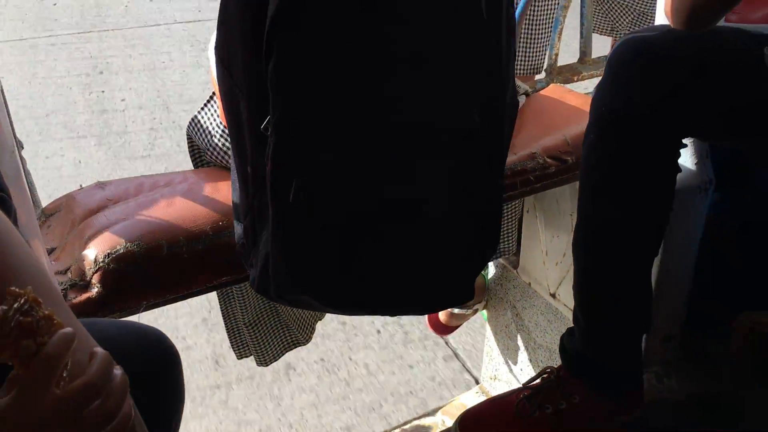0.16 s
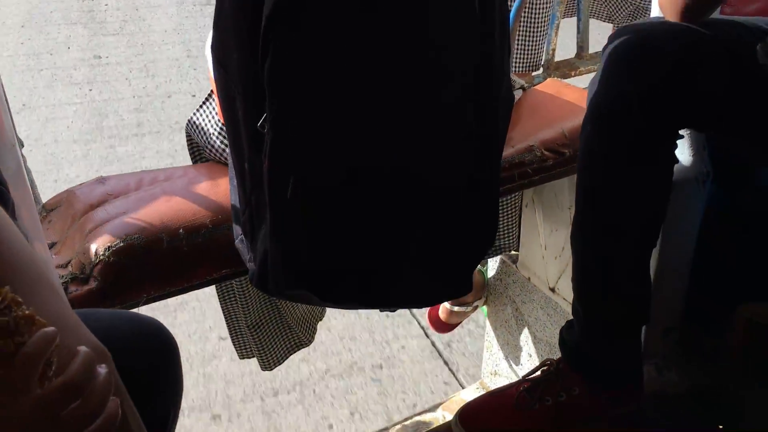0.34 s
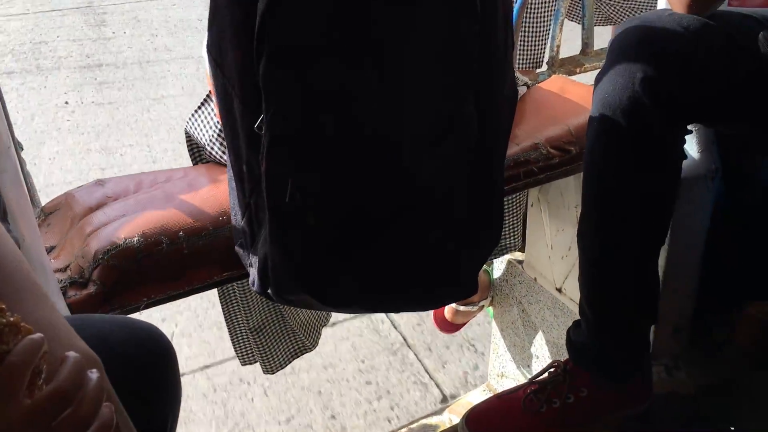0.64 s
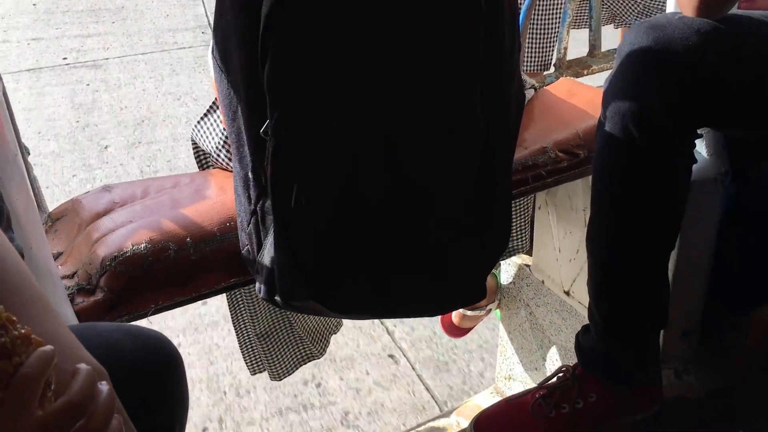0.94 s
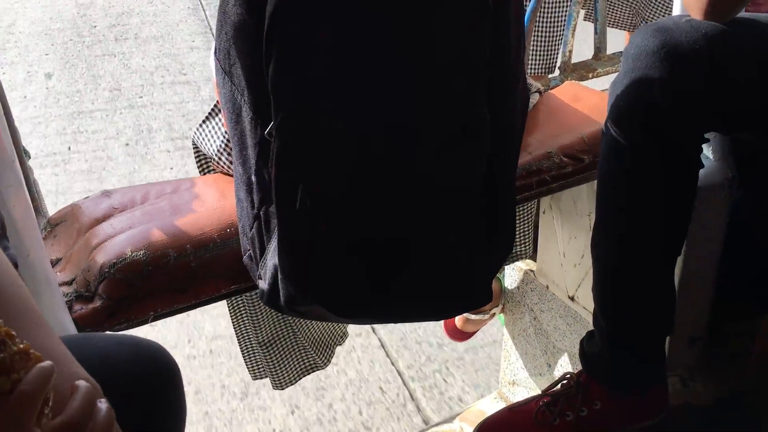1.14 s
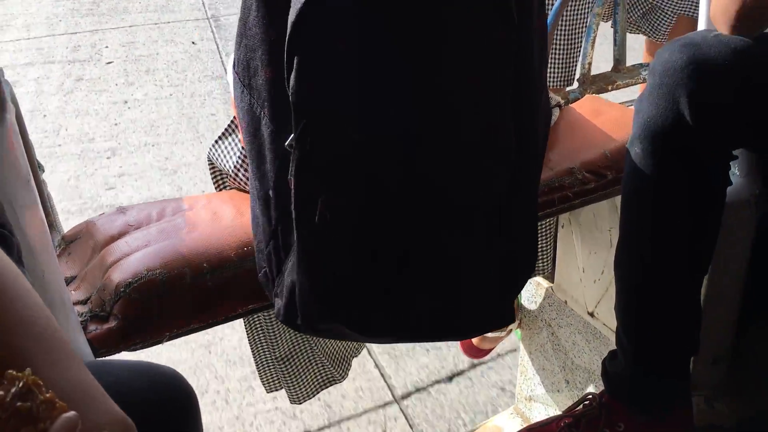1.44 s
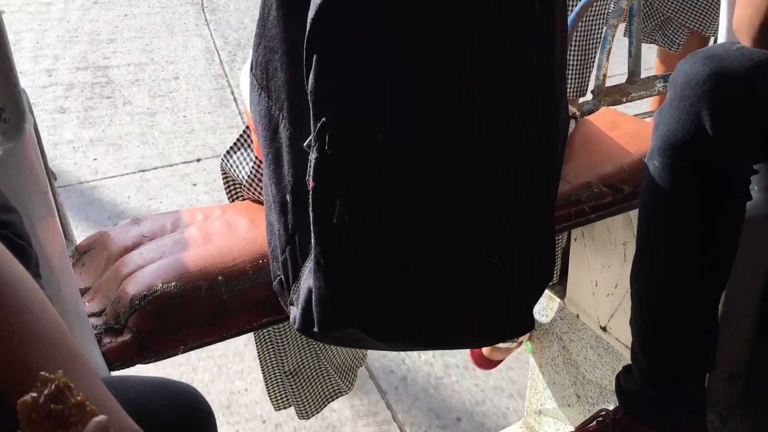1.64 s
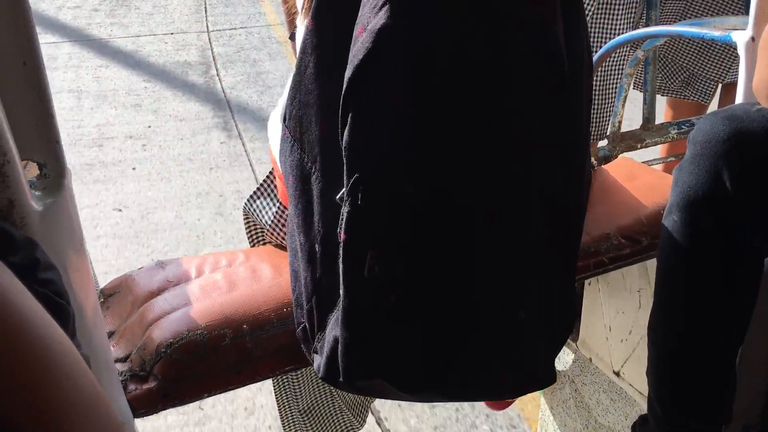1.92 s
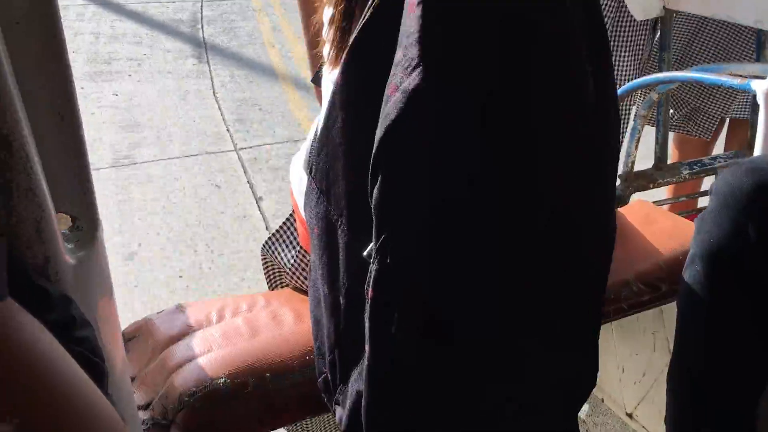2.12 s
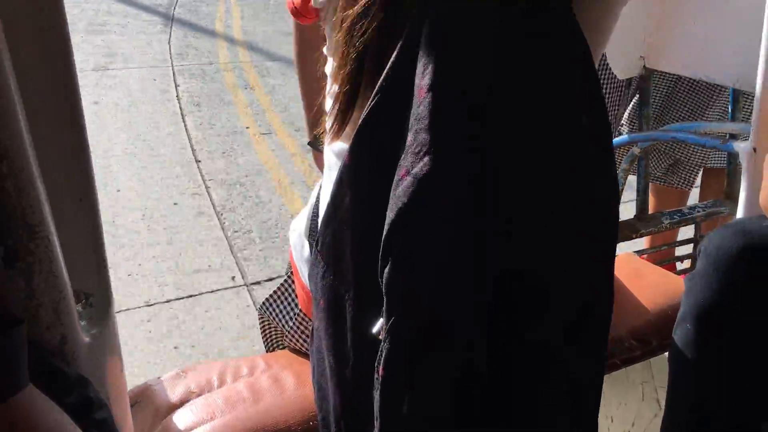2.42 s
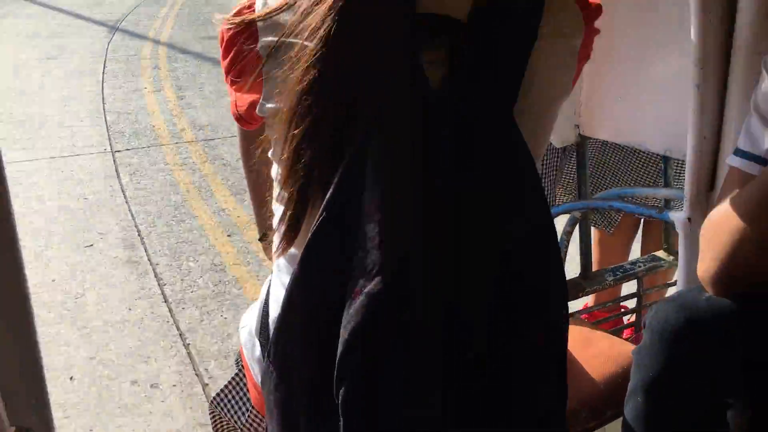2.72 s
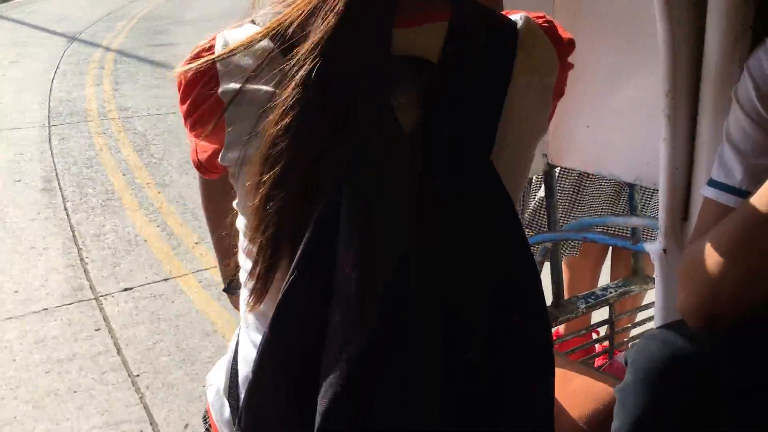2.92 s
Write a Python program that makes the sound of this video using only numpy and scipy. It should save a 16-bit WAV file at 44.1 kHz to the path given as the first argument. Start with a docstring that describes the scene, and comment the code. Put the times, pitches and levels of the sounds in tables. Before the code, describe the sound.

A diesel bus engine drones low, then growls louder and clanks as the throttle opens.

```python
"""A four-cylinder diesel, heard from a passenger seat in an open-sided bus on a concrete road.
Sines at the firing rate and its multiples make the exhaust; bursts of noise at each firing ring the block.
Halfway the driver opens the throttle: the exhaust hardens, the knock grows and the engine cover clanks.
Coloured noise makes the road's rumble and hiss; grainy bursts and rough chirps make the loose metal
fittings rattle and squeak. One channel, with rounded peaks and no extreme treble."""
import sys
import numpy as np
from scipy import signal
from scipy.fft import rfft, irfft, next_fast_len
from scipy.io import wavfile
from scipy.ndimage import uniform_filter1d

SR = 44100
rng = np.random.default_rng(int(sys.argv[2]) if len(sys.argv) > 2 else 0)


def master_out(mix):
    """Clip the mix to full scale and print it as 16-bit PCM to the path in sys.argv[1]."""
    frames = np.transpose(np.atleast_2d(mix))
    ceiling = np.clip(frames, -1, 1)
    pcm = np.round(ceiling * 32767).astype(np.int16)
    wavfile.write(sys.argv[1], SR, pcm)


N = 135387  # samples

# Boom of the cabin at the firing rate: t/s, level/dB
BOOM_LEVEL = [(0, -23.5), (.07, -20.5), (.19, -20.5), (.24, -10.5), (.45, -19.5), (.63, -11.5),
              (.73, -16.5), (1.13, -15), (1.3, -23), (1.36, -11.5), (1.44, -20), (1.7, -22), (1.82, -14.5),
              (1.92, -11), (2.15, -12.5), (2.45, -13), (2.78, -20), (3.03, -13)]
# Throttle: t/s, exhaust overtone level/dB, knock level/dB
THROTTLE_LEVELS = [(0, -29.5, -45), (.6, -36, -46.5), (1.1, -31.5, -45), (1.45, -28.5, -46),
                   (1.68, -23.5, -38), (1.85, -17, -32), (2.02, -17.5, -27.5), (2.25, -16.5, -31),
                   (2.5, -18.5, -31), (2.65, -22, -36), (2.8, -23, -38), (2.95, -21.5, -34.5),
                   (3.07, -19.5, -31)]
# Exhaust overtones: multiple of the firing rate, relative level/dB
EXHAUST_OVERTONES = [(1.25, -28), (1.75, -17.5), (2, -1.5), (2.25, -16.5), (2.5, -12.5), (3, -13),
                     (3.5, -24.5), (4, -24.5)]
# Strength of each cylinder's knock in firing order: relative level/dB
CYLINDER_LEVEL_DB = [4.5, 1.3, 1.8, -3]
# Ringing of the engine block and its cover: f/Hz, width/Hz, relative level/dB
BLOCK_MODES = [(699.7, 24.5, 6.5), (996, 80, 2), (1188, 45, -0.5), (1601, 31, 3.5), (1914, 85, 0.5),
               (2767, 65, -7.5), (3248, 20, -2)]
# Broad crack of the knock: f/Hz, relative level per Hz/dB
CRACK_COLOUR = [(100, -22), (300, -11), (430, -5), (520, -9), (1000, -1), (1370, -5), (2000, -2),
                (2450, -6), (3400, -5), (4400, -12), (5500, -19), (9000, -32), (11000, -47)]
# Sizzle that joins the knock under load: f/Hz, relative level per Hz/dB
SIZZLE_COLOUR = [(1000, -25), (3000, 2), (9500, -8), (10500, -14), (16000, -18)]
# Whine of the engine's gears: f/Hz, level relative to the knock/dB
GEAR_WHINE = [(676, -22), (985, -15.5), (1118, -19), (2292, -19), (2466, -24)]
# Road rumble: f/Hz, relative level per Hz/dB; then t/s, level/dB
RUMBLE_COLOUR = [(15, -10.5), (30, -25.5), (42, -1.5), (52, 7.5), (80, 3), (100, -2), (150, -6), (200, -23),
                 (330, -35.5), (700, -78.5)]
RUMBLE_COURSE = [(0, -23), (.9, -25), (1.35, -20.5), (1.6, -22), (1.85, -16.5), (2.15, -21.5), (2.6, -22.5),
                 (3.07, -21.5)]
# Drone of the body panels: f/Hz, relative level per Hz/dB; then t/s, level/dB
DRONE_COLOUR = [(100, -10.5), (180, 1.5), (340, 1.5), (450, -5.5), (520, -9.5), (2000, -44.5)]
DRONE_COURSE = [(0, -37.5), (.35, -34.5), (.95, -37.5), (1.32, -33.5), (1.5, -35), (2, -32.5), (2.3, -38),
                (2.8, -39.5), (3.07, -35)]
# Rush of tyres and air: f/Hz, relative level per Hz/dB; then t/s, level/dB
RUSH_COLOUR = [(100, -2.5), (350, -16), (560, -0.5), (950, 1), (1500, -4.5), (2100, -12), (2600, -5.5),
               (3200, -21), (5000, -23.5), (7500, -36), (16000, -71)]
RUSH_COURSE = [(0, -41.5), (.95, -45.5), (1.7, -37.5), (2.7, -43)]
# Rattles of loose fittings, before the cabin: start t/s, decay/s, level/dB, ring f/Hz
RATTLE_EVENTS = [(.049, 0.0071, -47.5, 9000), (0.293, 0.0039, -34, 7400), (0.338, 0.019, -43, 11500),
                 (.378, 0.026, -50, 6700), (1.038, 0.0082, -48, 9000), (1.219, 0.0062, -40.5, 2800),
                 (1.444, 0.03, -51, 5500), (1.484, 0.03, -51.5, 6300), (1.535, 0.012, -47, 12600)]
# Colour of the fittings: f/Hz, relative level per Hz/dB
FITTING_COLOUR = [(1500, -22), (2800, -2), (6800, 1), (10000, -5), (11500, -2), (16000, -12)]
# Squeaks of a dry metal joint, before the cabin:
# start t/s, length/s, f/Hz, level/dB, glide per length as a share of f
SQUEAK_EVENTS = [(0.681, 0.02, 3750, -51, 0), (0.699, .013, 3720, -38.5, 0.04),
                 (0.822, .011, 3800, -40.5, -0.007), (0.827, 0.018, 3620, -40, -0.03)]
# Harmonics of a squeak from the first up: relative level/dB
SQUEAK_HARMONIC_DB = [2, -3, 2.5, -2]
# Blows on the engine cover: t/s, dull clank level/dB, bright chatter level/dB
COVER_BLOWS = [(1.844, -16.5, -42), (1.877, -32, -34), (1.944, -28, -29), (1.981, -24, -38),
               (2.012, -27, -30), (2.116, -36, -28), (2.15, -36, -30), (2.218, -18.5, -28),
               (2.287, -22, -32), (2.353, -25, -32), (2.422, -26, -28), (2.695, -28, -37),
               (2.763, -38, -37), (2.967, -37, -36), (3.033, -30, -32)]
# Colour of the dull clank: f/Hz, relative level per Hz/dB
CLANK_COLOUR = [(300, -18), (700, -8), (1050, 8), (1350, -8.5), (1600, -1.5), (2100, -15), (3200, -28),
                (5000, -56)]
# Ringing of the cover's edge: f/Hz, width of each of two passes/Hz, relative level/dB
COVER_MODES = [(2450, 200, 3), (2864, 230, 6.5), (3170, 96, 5.5), (3640, 130, -8), (4250, 140, -10),
               (4630, 380, -6)]

FIRING_HZ, FIRST_FIRING_S = 58.7, .0345
SPEED_WANDER = .001  # share of the speed
EXHAUST_LAG_S, BOOM_LAG_S = .009, .0013  # through the pipe; further lag of the cabin's boom
EXHAUST_WAVER_DB = -0.02
KNOCK_ATTACK_S, KNOCK_DECAY_S = 0.002, 0.012
CLATTER_SHARE = 0.06  # constant clatter added to the blows
KNOCK_SCATTER_DB, MODE_SCATTER_DB = 1.1, 2.3  # from firing to firing
RING_DB, CRACK_DB, SIZZLE_DB = -4, -5.5, -19  # relative to the knock
WHINE_WAVER = 0.1  # turns of phase
ENGINE_GRAIN_DB, FITTING_GRAIN_DB = 2.5, 4.5
SQUEAK_ROUGH = .035  # share of the pitch
SCRAPE_DB = -4  # relative to the squeak's harmonics
CLANK_DECAY_S, CHATTER_DECAY_S = .01, .01
CABIN_T60_S, CABIN_DB = .13, -7
CEILING = .78  # of full scale
TOP_HZ = 15800


def undb(db):
    """Decibels to gain."""
    return 10 ** (np.asarray(db) / 20)


def unit(x):
    """Scale to rms 1."""
    return x / np.sqrt(np.mean(x ** 2))


def noise():
    """White noise."""
    return rng.standard_normal(N)


def curve(table, t):
    """Gain along rows of t/s, level/dB."""
    return undb(np.interp(t, *np.array(table).T))


def walk(rate):
    """Smooth random drift: levels held 1 / rate s and slewed twice; spread near 1."""
    hold = int(SR / rate)
    steps = np.repeat(noise()[:N // hold + 1], hold)
    slewed = uniform_filter1d(uniform_filter1d(steps, hold), hold)
    return 1.3 * slewed[:N]


def colour(x, points):
    """Causal minimum-phase filter through points of f/Hz, level/dB; rms 1."""
    size = next_fast_len(N + SR // 2, True) // 2 * 2
    hz, db = np.array(points, float).T
    bins = np.fft.rfftfreq(size, 1 / SR) + 1
    log_gain = np.log(undb(np.interp(np.log(bins), np.log(hz), db)))
    # folding the cepstrum onto positive time makes the filter causal
    cepstrum = irfft(log_gain)
    cepstrum[1:size // 2] *= 2
    cepstrum[size // 2 + 1:] = 0
    response = np.exp(rfft(cepstrum))
    return unit(irfft(rfft(x, size) * response)[:N])


def resonate(x, hz, width):
    """One resonance, gain 1 at its centre."""
    return signal.lfilter(*signal.iirpeak(hz, hz / width, fs=SR), x)


def tone(turns):
    """Sine of rms 1."""
    return np.sqrt(2) * np.sin(2 * np.pi * turns)


def burst(t, start, decay):
    """Envelope of a blow: a quick rise and a fall."""
    age = np.maximum(t - start, 0)
    return (1 - np.exp(-age / 0.0028)) * np.exp(-age / decay)


def chatter(grain_db):
    """Grainy contact of metal bouncing on metal; rms 1."""
    return unit(noise() * undb(grain_db * walk(900)))


def cabin(x):
    """Seats, floor and roof add a dense, short ring."""
    t = np.arange(int(SR * CABIN_T60_S)) / SR
    tail = noise()[:len(t)] * np.exp(-np.log(1000) * t / CABIN_T60_S)
    wet = signal.fftconvolve(x, tail / np.linalg.norm(tail))[:N]
    return (x + undb(CABIN_DB) * wet) / np.hypot(1, undb(CABIN_DB))


def exhaust(t, firings):
    """Pulses arrive late through the pipe: a boom at the firing rate, and overtones set by the throttle."""
    turns = firings - EXHAUST_LAG_S * FIRING_HZ
    boom = curve(BOOM_LEVEL, t) * tone(turns - BOOM_LAG_S * FIRING_HZ)
    overtones = np.zeros(N)
    for multiple, db in EXHAUST_OVERTONES:
        level = undb(db + EXHAUST_WAVER_DB * walk(12))
        overtones += level * tone(multiple * turns + .013 * walk(9))
    return boom + curve(np.array(THROTTLE_LEVELS)[:, [0, 1]], t) * overtones


def gear_whine(firings):
    """Gears turn with the engine, so their tones follow its speed; level and phase waver."""
    whine = np.zeros(N)
    for hz, db in GEAR_WHINE:
        turns = hz * firings / FIRING_HZ + WHINE_WAVER * walk(29.92)
        whine += undb(db + 2 * walk(24.42)) * tone(turns)
    return whine


def knock(t, firings):
    """Each combustion cracks and rings the block with its own colour, some cylinders harder than others."""
    which = np.floor(firings).astype(int)
    cylinder_db = np.array(CYLINDER_LEVEL_DB)[which % len(CYLINDER_LEVEL_DB)]
    strength = undb(cylinder_db + KNOCK_SCATTER_DB * noise()[which])
    age = firings % 1 / FIRING_HZ
    envelope = (1 - np.exp(-age / KNOCK_ATTACK_S)) * np.exp(-age / KNOCK_DECAY_S)
    blow = strength * envelope + CLATTER_SHARE

    ring = np.zeros(N)
    for hz, width, db in BLOCK_MODES:
        scatter = undb(MODE_SCATTER_DB * noise()[which])  # one draw per firing
        ring += undb(db) * resonate(blow * scatter * noise(), hz, width)
    crack = undb(CRACK_DB) * cabin(colour(blow * noise(), CRACK_COLOUR))
    load = curve(np.array(THROTTLE_LEVELS)[:, [0, 2]], t)
    grains = np.sqrt(blow) * chatter(ENGINE_GRAIN_DB)
    # the sizzle follows the load twice: here and with the whole knock
    sizzle = undb(SIZZLE_DB) * load / load.max() * colour(grains, SIZZLE_COLOUR)
    return load * (undb(RING_DB) * unit(ring) + crack + sizzle + gear_whine(firings))


def road(t):
    """The body rumbles and its panels drone over the concrete; tyres and air rush in at the open sides."""
    rumble = curve(RUMBLE_COURSE, t) * colour(noise(), RUMBLE_COLOUR)
    drone = curve(DRONE_COURSE, t) * colour(noise(), DRONE_COLOUR)
    rush = curve(RUSH_COURSE, t) * colour(noise(), RUSH_COLOUR)
    return rumble + drone + rush


def rattles(t):
    """Loose fittings buzz briefly in grainy bursts, each with a ring of its own."""
    out = np.zeros(N)
    for start, decay, db, hz in RATTLE_EVENTS:
        contact = chatter(FITTING_GRAIN_DB)
        ring = unit(resonate(contact, hz, hz / 10))
        sound = unit(colour(contact, FITTING_COLOUR) + ring)
        out += undb(db) * burst(t, start, decay) * sound
    return out


def squeaks(t):
    """A joint slips in short, rough chirps, most of them gliding, with a scrape in them."""
    out = np.zeros(N)
    for start, length, hz, db, glide in SQUEAK_EVENTS:
        age = np.clip((t - start) / length, 0, 4)  # in lengths
        swell = np.minimum(age / 0.53, 1) * np.exp(-age ** 2)
        pitch = hz * (1 + glide * age + SQUEAK_ROUGH * walk(2500))
        turns = np.cumsum(pitch) / SR
        harmonics = np.zeros(N)
        for multiple, harmonic_db in enumerate(SQUEAK_HARMONIC_DB, 1):
            harmonics += undb(harmonic_db + 3.8 * walk(209)) * tone(multiple * turns)
        scrape = undb(SCRAPE_DB) * colour(noise(), FITTING_COLOUR)
        out += undb(db) * swell * (unit(harmonics) + scrape)
    return out


def clanks(t):
    """The shaking engine strikes its cover, mostly once a cycle: a dull clank and a bright edge chatter."""
    dull = sum(undb(db) * burst(t, start, CLANK_DECAY_S) for start, db, _ in COVER_BLOWS)
    bright = sum(undb(db) * burst(t, start, CHATTER_DECAY_S) for start, _, db in COVER_BLOWS)
    contact = chatter(ENGINE_GRAIN_DB)
    edge = np.zeros(N)
    for hz, width, db in COVER_MODES:
        edge += undb(db) * resonate(resonate(contact, hz, width), hz, width)
    return dull * colour(noise(), CLANK_COLOUR) + bright * unit(edge)


def scene():
    """Engine, road and fittings, heard from a passenger seat."""
    t = np.arange(N) / SR
    speed = 1 + SPEED_WANDER * walk(8)
    firings = FIRING_HZ * (np.cumsum(speed) / SR - FIRST_FIRING_S)  # running count
    engine = exhaust(t, firings) + knock(t, firings)
    fittings = cabin(rattles(t) + squeaks(t))
    return (engine + road(t) + fittings + clanks(t))[None]


def record(dry):
    """The recorder rounds the highest peaks and cuts the top."""
    soft = dry / (1 + (dry / CEILING) ** 8) ** (1 / 8)
    low_pass = signal.ellip(10, .1, 80, TOP_HZ, fs=SR, output="sos")
    return signal.sosfilt(low_pass, soft)


dry = scene()
out = record(dry)
master_out(out)
```